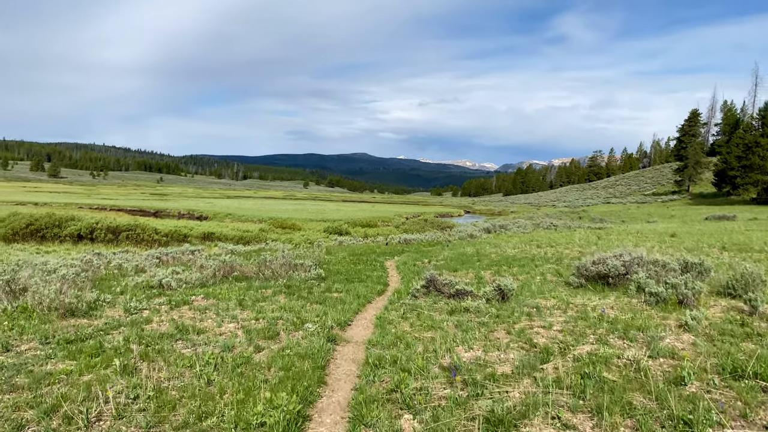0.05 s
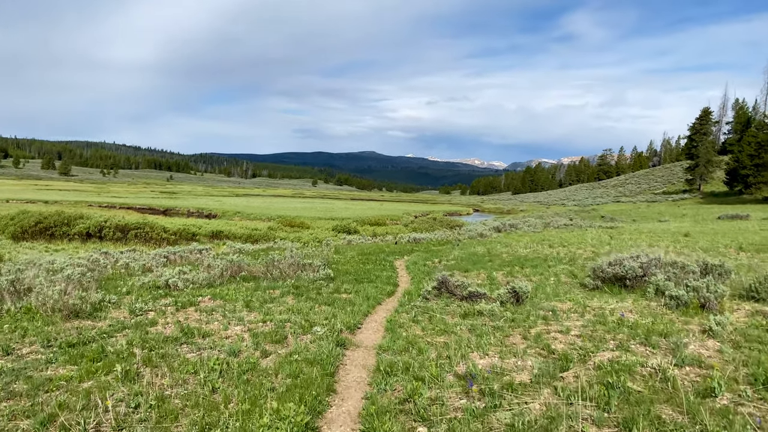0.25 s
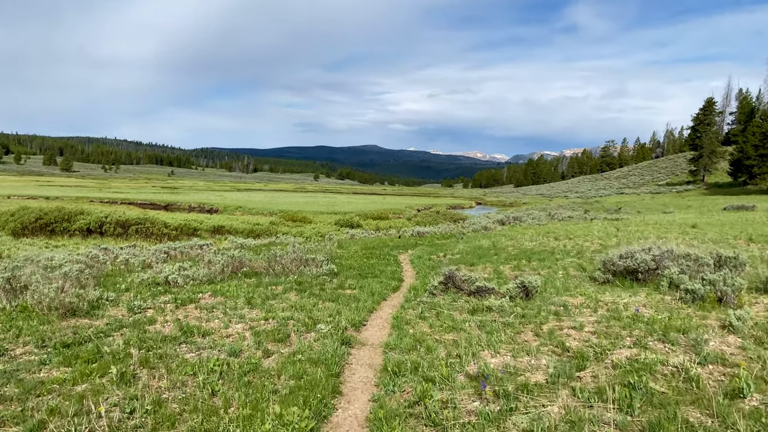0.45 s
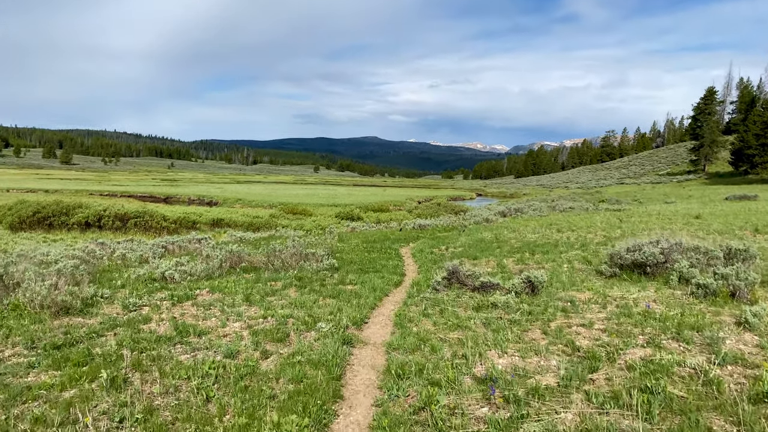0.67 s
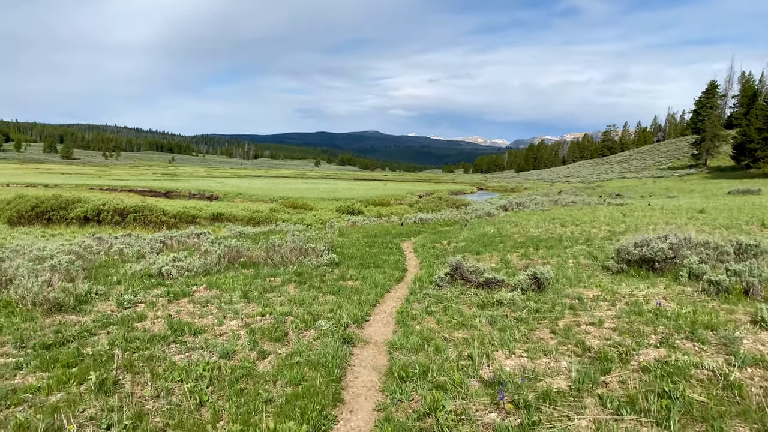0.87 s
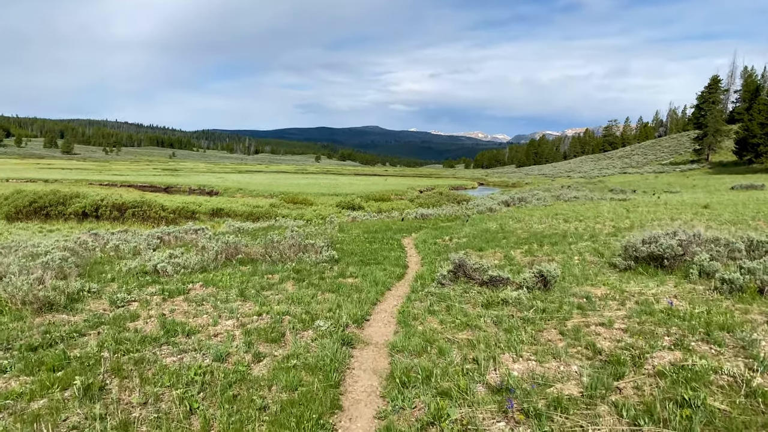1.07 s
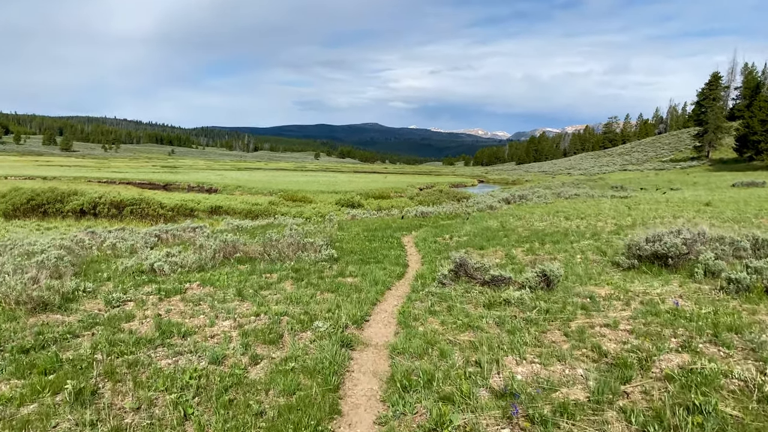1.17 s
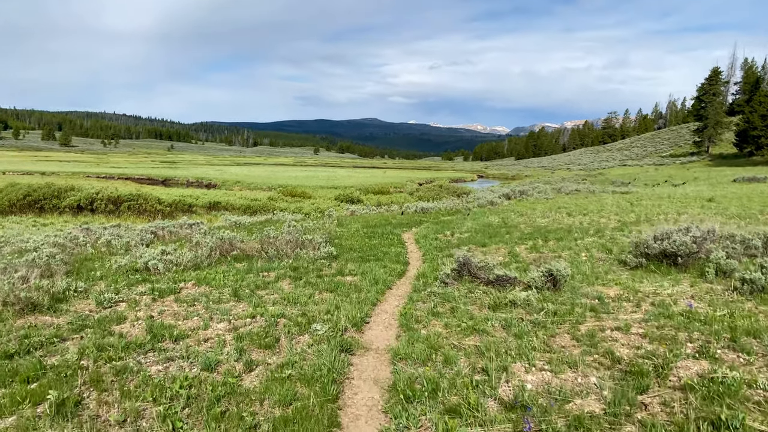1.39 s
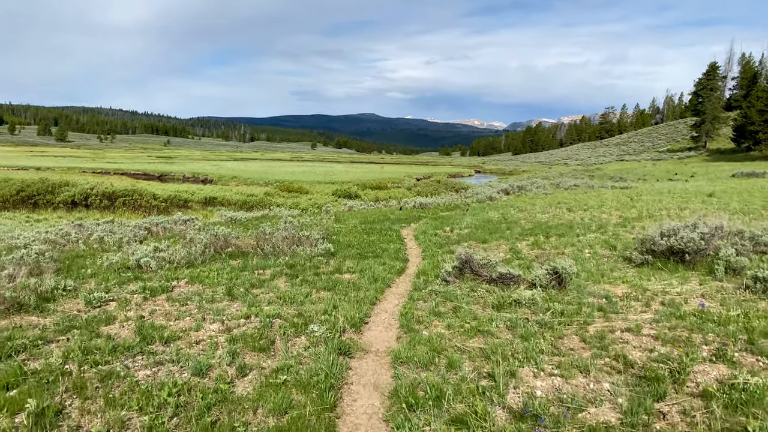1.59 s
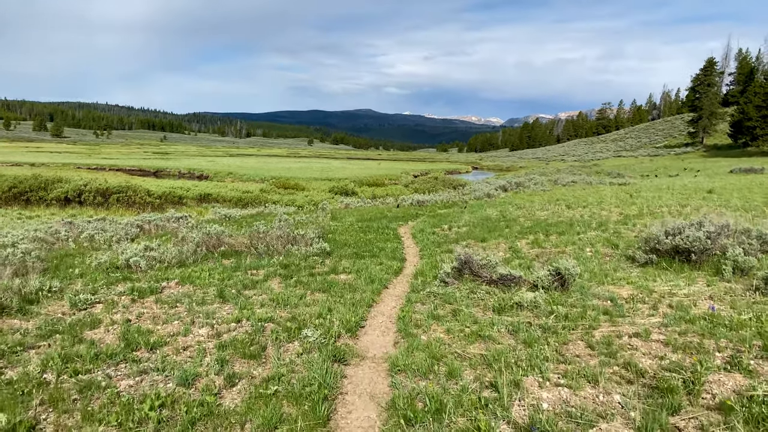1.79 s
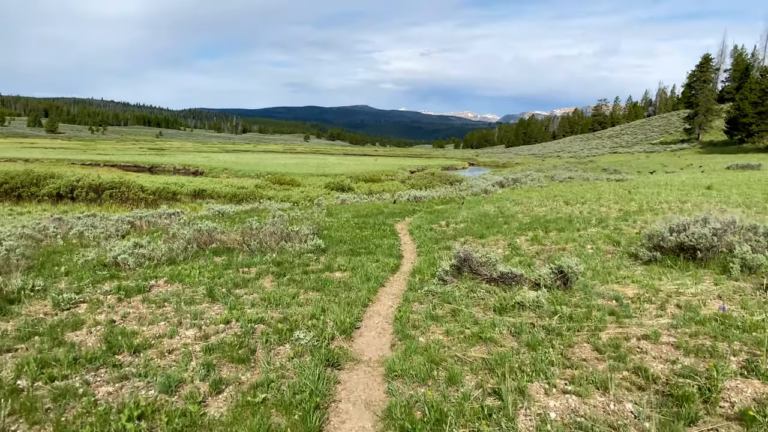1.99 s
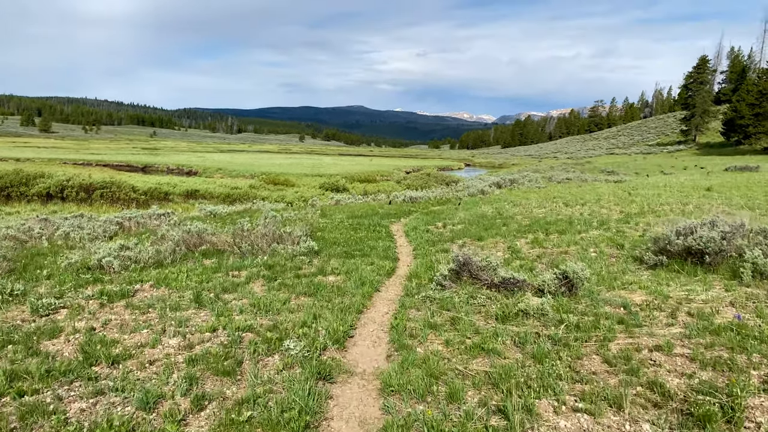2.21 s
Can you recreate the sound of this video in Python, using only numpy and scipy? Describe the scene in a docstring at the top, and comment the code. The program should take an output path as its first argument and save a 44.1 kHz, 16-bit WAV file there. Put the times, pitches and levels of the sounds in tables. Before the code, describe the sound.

One sharp clack, like a pole being struck, rattles briefly near a hand-held microphone outdoors. A walker then continues softly over packed earth, with light grit crunching, rustling grass and clothing, and a few sharper knocks toward the end.

```python
"""A hard piece of gear, perhaps a pole, clacks three times close by on the left of a walker on a meadow
trail. Each impact excites its damped modes, rebounds once and sets loose parts buzzing. Steps thud, knock
and slap on packed earth; grit crunches, dry stalks snap and there is one faint squeak. Grass and clothing
swish with the stride as friction noise. The two microphone ports of a hand-held phone pick it all up."""
import sys
import numpy as np
from scipy import signal
from scipy.fft import rfft, irfft, next_fast_len
from scipy.io import wavfile
from scipy.ndimage import map_coordinates

SR = 44100
rng = np.random.default_rng(int(sys.argv[2]) if len(sys.argv) > 2 else 0)


def file_out(sig):
    """Save sig as 16-bit WAV at sys.argv[1]."""
    # one column per channel
    cols = np.atleast_2d(sig).T
    # limit, then scale
    lim = np.clip(cols, -1, 1)
    pcm = np.round(lim * 32767).astype(np.int16)
    wavfile.write(sys.argv[1], SR, pcm)


N = 99225


def undb(db):
    """Amplitude ratio of a level in decibels."""
    return 10 ** (np.asarray(db) / 20)


def unit(x):
    """Normalisation to an rms of 1."""
    return x / np.sqrt(np.mean(x ** 2))


def clock(start=0):
    """Time in seconds since start, zero before it."""
    return np.maximum(np.arange(N) / SR - start, 0)


def envelope(points):
    """Amplitude envelope interpolated through (t/s, level/dB) points."""
    return undb(np.interp(clock(), *np.array(points).T))


def delay(x, seconds):
    """Fractional delay by spline interpolation."""
    return map_coordinates(x, [np.arange(N) - seconds * SR])


def colour(x, points):
    """Minimum-phase filter through (f/Hz, level/dB) points."""
    hz, db = np.array(points).T
    size = next_fast_len(N // 4) * 8
    f = np.maximum(np.arange(size // 2 + 1) * SR / size, 1)
    gain = undb(np.interp(np.log(f), np.log(hz), db))
    cepstrum = irfft(np.log(gain))
    cepstrum[1:size // 2] *= 2  # folding onto positive time makes the filter causal
    cepstrum[size // 2 + 1:] = 0
    return irfft(rfft(x, size) * np.exp(rfft(cepstrum)))[..., :N]


def band(x, hz, width):
    """Band-pass at unit rms, with edges a factor 1 + width either side of hz."""
    edges = np.minimum([hz / (1 + width), hz * (1 + width)], [SR * .44, SR * .48])
    return unit(signal.sosfilt(signal.butter(2, edges, "band", fs=SR, output="sos"), x))


def pair(draw, correlation):
    """Partly correlated channels: the sum of an in-phase and an antiphase random signal."""
    common = np.sqrt((1 + correlation) / 2) * draw()
    opposed = np.sqrt((1 - correlation) / 2) * draw()
    return np.array([common + opposed, common - opposed])


def noise():
    """Gaussian white noise."""
    return rng.standard_normal(N)


def grains(per_s=1300, spread_db=3.5):
    """Shot noise: dense random clicks, a few much larger than the rest."""
    size = undb(spread_db * np.minimum(rng.exponential(size=N), 5))
    return unit(np.sign(noise()) * size * (rng.random(N) < per_s / SR))


def ring(t, modes, pitch=1):
    """Free vibration: a sum of exponentially damped modes of alternating sign."""
    return sum((-1) ** k * undb(db) * np.sin(2 * np.pi * hz * pitch * t) * np.exp(-np.log(1000) * t / t60)
               for k, (hz, db, t60) in enumerate(modes))


def swish(treble_exponent=1.9):
    """Friction noise of grass and cloth; its treble grows as a power of the rubbing effort."""
    # spectrum of the friction: f/Hz, level/dB
    spectrum = [(200, -27), (2200, 4), (3300, 1), (7500, -3.5), (10000, -11.5), (14000, -13.5),
                (16000, -50)]
    # rubbing effort over the stride: t/s, level/dB
    levels = [(0, -66), (.18, -59.5), (.33, -65.5), (.45, -60.5), (.55, -68), (.65, -63.5), (.78, -66.5),
              (.83, -72.5), (.91, -72.5), (1.0, -64.5), (1.16, -68), (1.31, -60.5), (1.46, -69.5),
              (1.59, -60), (1.69, -65.5), (1.77, -62), (1.87, -62.5), (1.96, -60), (2.02, -67),
              (2.11, -63.5)]
    effort = envelope(levels)
    friction = pair(noise, correlation=0) + undb(-1) * pair(grains, correlation=0)
    hiss = unit(colour(friction, spectrum))
    treble = signal.sosfiltfilt(signal.butter(2, 9000, "high", fs=SR, output="sos"), hiss)
    return effort * (hiss + treble * (unit(effort) ** (treble_exponent - 1) - 1))


def scuffs():
    """Sliding friction of soles and legs in grass: noise bands under Gaussian envelopes."""
    # strokes through the grass: centre t/s, 1/e half-length/s, level/dB, f/Hz
    strokes = [(0.207, 0.043, -61.5, 11500), (1.259, 0.052, -60, 1160), (1.764, 0.043, -55.5, 2070),
               (1.905, 0.096, -63.5, 12000)]
    friction = pair(noise, correlation=0.19) + pair(grains, correlation=0)
    return sum(undb(db) * band(friction, hz, width=0.26) * np.exp(-((clock() - centre) / half) ** 2)
               for centre, half, db, hz in strokes)


def crunch():
    """Many tiny contacts of grit underfoot merge into shot noise that swells with the stride."""
    # spectrum of the trodden grit: f/Hz, level/dB
    spectrum = [(25, -5), (60, 0.5), (350, -6.5), (650, -3.5), (1200, -1), (1700, -8.5), (2500, -14),
                (4000, -24.5), (16000, -62.5)]
    # strength of the crunch: t/s, level/dB
    levels = [(0, -61), (.28, -58), (.39, -55.5), (.50, -55), (.58, -60.5), (.66, -57.5), (.78, -64),
              (.89, -65.5), (1.0, -58.5), (1.135, -64.5), (1.175, -58), (1.26, -54.5), (1.44, -60),
              (1.58, -53.5), (1.68, -60), (1.76, -56.5), (2.0, -62), (2.17, -56)]
    contacts = pair(grains, correlation=0.76) + undb(-4) * pair(noise, correlation=0.45)
    return unit(colour(contacts, spectrum)) * envelope(levels)


def snaps(decay_s=0.0039):
    """Brittle fracture of dry stalks: each gives a noise band with an exponential decay."""
    # breaking stalks: t/s, level/dB, f/Hz
    fractures = [(0.09, -56, 8900), (0.7028, -58, 6400), (0.786, -60, 6540), (1.546, -44, 2980),
                 (1.826, -51.5, 4200), (1.880, -47, 5170), (1.950, -46, 13700), (2.105, -58.5, 7600),
                 (2.184, -52, 10900)]
    out = 0
    for start, db, hz in fractures:
        t = clock(start)
        burst = band(pair(noise, correlation=0.41), hz, width=0.24)
        out = out + undb(db) * burst * (t > 0) * np.exp(-t / decay_s)
    return out


def squeak(centre_s=1.783, half_s=0.009, hz=3533, rise_hz_per_s=12000):
    """A faint linear chirp, roughened by narrow-band noise, under a Gaussian envelope."""
    t = clock() - centre_s
    tone = np.sin(2 * np.pi * (hz + rise_hz_per_s * t / 2) * t)
    rasp = undb(-5) * band(pair(noise, correlation=0), hz, width=0.09)
    return undb(-48) * (tone + rasp) * np.exp(-(t / half_s) ** 2)


def slaps(drop_hz=405, end_hz=115, peak_s=0.0051):
    """Impacts of the sole: short tone pulses whose frequency relaxes exponentially downward."""
    # pats of the sole: t/s, level/dB
    pats = [(0.482, -54), (0.614, -51), (1.063, -50.5), (1.604, -46)]
    out = 0
    for start, db in pats:
        t = clock(start)
        cycles = end_hz * t + drop_hz * peak_s * (1 - np.exp(-t / peak_s))
        out = out + undb(db) * np.sin(2 * np.pi * cycles) * t / peak_s * np.exp(1 - t / peak_s)
    return out


def thuds(lowest_hz=54.2, db_per_octave=23.5):
    """Soft impacts of the stride: damped oscillations that sink in pitch, the heaviest lowest."""
    # jolts of the stride: t/s, level/dB
    jolts = [(0.012, -49.5), (0.297, -48), (0.366, -43.5), (0.467, -45.5), (0.613, -40.5), (0.729, -41.5),
             (1.147, -38.5), (1.288, -46.5), (1.342, -42), (1.476, -48.5), (1.586, -38), (1.667, -41),
             (1.842, -46), (1.921, -45), (2.208, -46)]
    # spectrum of the rumble in each jolt: f/Hz, level/dB
    spectrum = [(25, -13), (60, 0.5), (150, 2), (260, -2.5), (2000, -69)]
    rise_s, decay_s = 0.006, 0.02
    glide, glide_s = 1.27, 0.0089  # the frequency starts at 1 + glide times its final value
    right_db, right_lag_rad = -3, 2.36
    rumble = undb(-19.5) * unit(colour(pair(noise, correlation=0), spectrum))
    heaviest_db = max(db for _, db in jolts)
    out = 0
    for start, db in jolts:
        t = clock(start)
        final_hz = lowest_hz * 2 ** ((heaviest_db - db) / db_per_octave)
        phase = 2 * np.pi * final_hz * (t + glide * glide_s * (1 - np.exp(-t / glide_s)))
        swell = 2 * (1 - np.exp(-(t / rise_s) ** 2)) * np.exp(-t / decay_s)
        tone = np.sin([phase, phase - right_lag_rad])
        out = out + undb(db) * (swell * tone + np.sqrt(swell) * rumble)
    return out * undb([[0], [right_db]])


def knocks(rise_s=0.00047, grit_decay_s=0.0051):
    """Impacts on packed earth excite heavily damped modes and a spray of grit."""
    # knocks on the ground: t/s, level/dB, pitch f/Hz
    impacts = [(0.371, -42, 1330), (0.9846, -37, 1910), (1.0627, -45, 1150), (1.163, -47, 1150),
               (1.413, -47, 950), (1.5594, -27.5, 1620), (1.6023, -35, 1310), (2.1458, -26.5, 1090),
               (2.2428, -25.5, 1010)]
    # modes of a knock: f/pitch, level/dB, T60/s
    modes = [(.38, -6.5, 0.0076), (1, 3.5, 0.0072), (1.35, 0.5, 0.0076)]
    # spectrum of the scattered grit: f/Hz, level/dB
    spectrum = [(450, 1.5), (1500, -2), (2500, -4.5), (4000, -12), (16000, -45)]
    grit = undb(-27) * unit(colour(pair(noise, correlation=0.96), spectrum))
    out = 0
    for start, db, hz in impacts:
        t, strength = clock(start), undb(db)
        body = strength * ring(t, modes, hz)
        spray = np.sqrt(strength) * grit * np.exp(-t / grit_decay_s)
        out = out + (1 - np.exp(-t / rise_s)) * (body + spray)
    return out


def gear(rebound_s=0.0056, crack_s=0.0019, rattle_decay_s=0.011, low_cut_hz=237):
    """Impact excitation of hard gear: each blow cracks, rings its modes, rebounds and buzzes loose parts."""
    # blows: t/s, level/dB, spectral tilt/(dB per octave), relative rebound level/dB
    blows = [(0.2154, -9, 0.13, -14.5), (0.2383, -19.5, -2.5, -13.5), (0.309, -29, 2, -7.5)]
    # normal modes of the gear: f/Hz, level/dB, T60/s
    modes = [(265, -35.5, 0.096), (492.7, -30, 0.091), (774, -7.5, 0.031), (965, 2, 0.0085),
             (1227, 2.5, 0.012), (1299, -9, .033), (1597, -9.5, 0.028), (1994, -1.5, .012),
             (2367, -5.5, 0.011), (3092, -17, 0.034), (4173, -11, 0.019), (5116, -23.5, 0.0085)]
    # spectrum of the contact noise: f/Hz, level/dB
    crack_spectrum = [(2000, -19), (5000, -0.5), (10000, -9), (16000, -12.5)]
    # response at the right port relative to the left: f/Hz, level/dB
    right_response = [(200, 3), (750, -9), (1150, -4), (1500, 3.5), (4000, 1.1)]
    clacks = 0
    for start, db, tilt, rebound_db in blows:
        t = clock(start)
        ringing = ring(t, modes) + undb(rebound_db) * ring(clock(start + rebound_s), modes)
        contact = t / crack_s * np.exp(1 - 2 * t / crack_s)
        crack = undb(-17.5) * unit(colour(noise(), crack_spectrum)) * contact
        rattle = undb(-19.5) * band(noise(), hz=1260, width=0.69) * (t > 0) * np.exp(-t / rattle_decay_s)
        brightness = [(375, -2 * tilt), (6000, 2 * tilt)]  # spans four octaves
        clacks = clacks + undb(db) * colour(ringing + crack + rattle, brightness)
    left = signal.sosfilt(signal.butter(4, low_cut_hz, "high", fs=SR, output="sos"), clacks)
    right = delay(colour(left, right_response), seconds=0.00035)  # the farther port
    return np.array([left, right])


def scene():
    """Superposition of all sources at two ports; sound from the ground reaches the right one later."""
    left, right = knocks() + snaps() + slaps() + crunch() + swish() + scuffs()
    ground = np.array([left, delay(right, seconds=0.0001)])
    return gear() + thuds() + squeak() + ground


def record(dry):
    """Frequency response of the phone: its ports notch the high treble and a low-pass limits the band."""
    port_response = [(10800, 1), (11600, -9), (12100, -23), (12700, -4), (13500, 0), (16000, -4)]
    low_pass = signal.ellip(8, 0.2, 70, 15900, fs=SR, output="sos")
    return signal.sosfilt(low_pass, colour(dry, port_response))


dry = scene()
out = record(dry)
file_out(out)
```